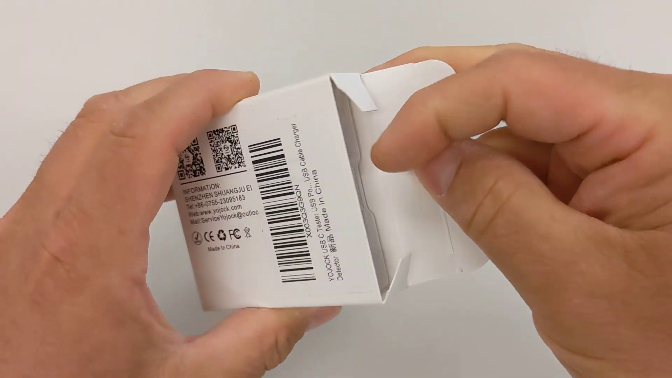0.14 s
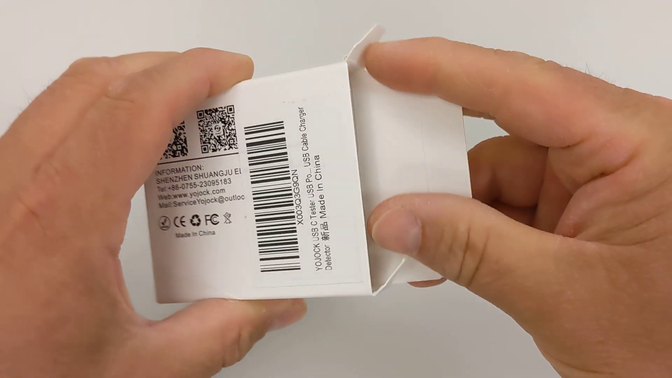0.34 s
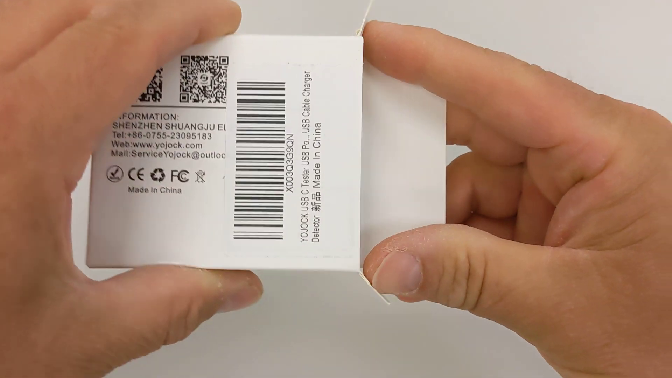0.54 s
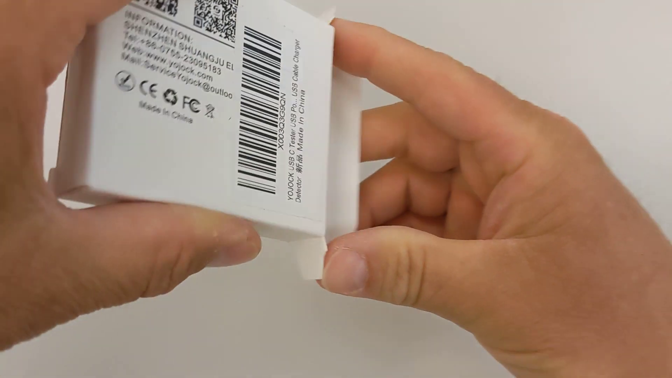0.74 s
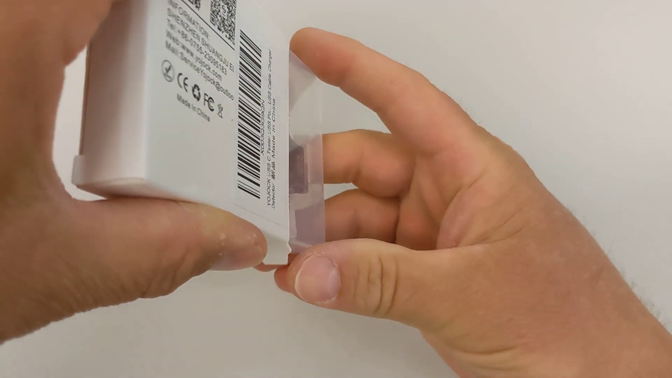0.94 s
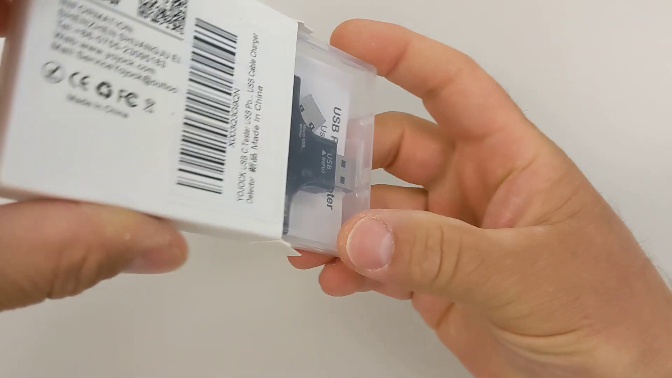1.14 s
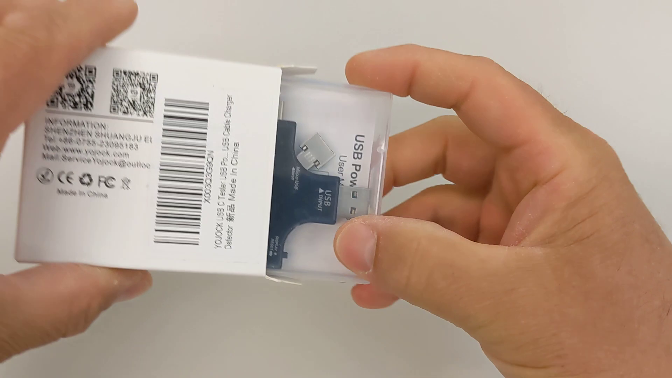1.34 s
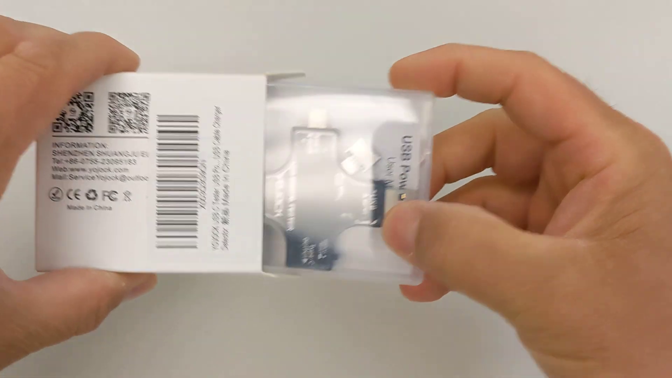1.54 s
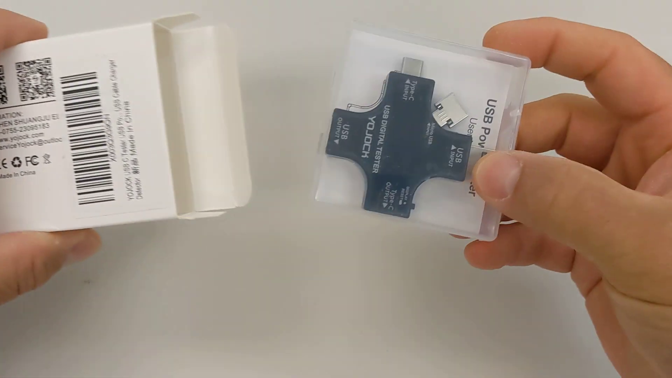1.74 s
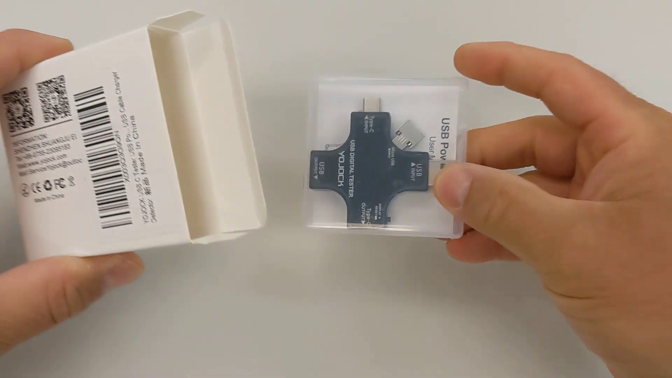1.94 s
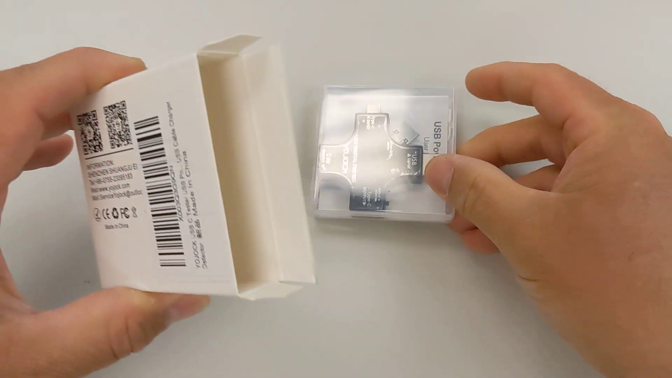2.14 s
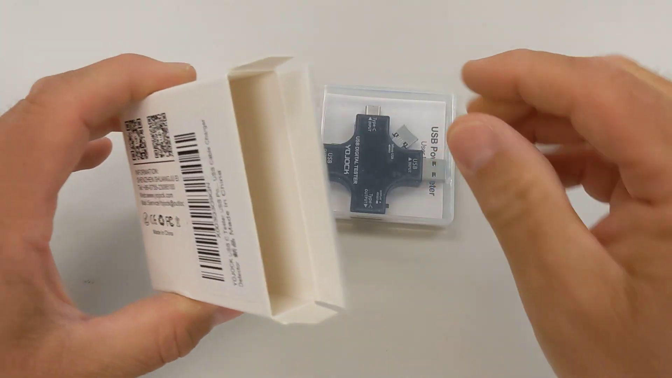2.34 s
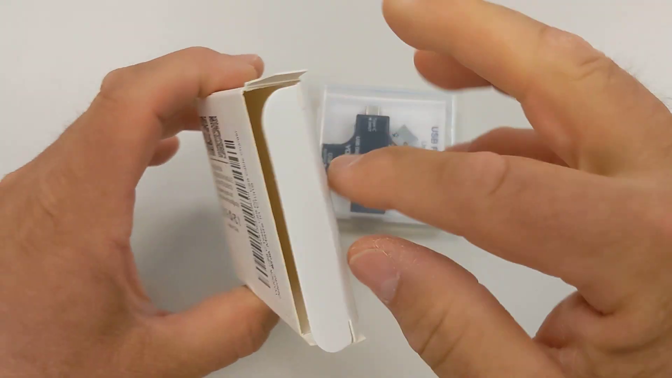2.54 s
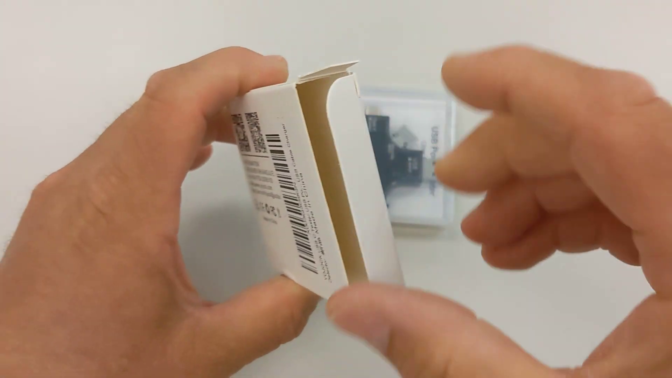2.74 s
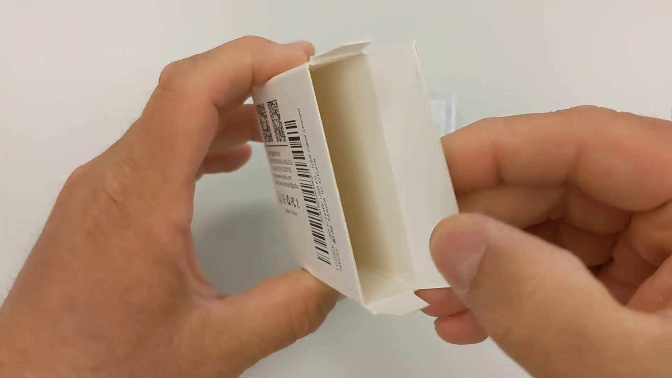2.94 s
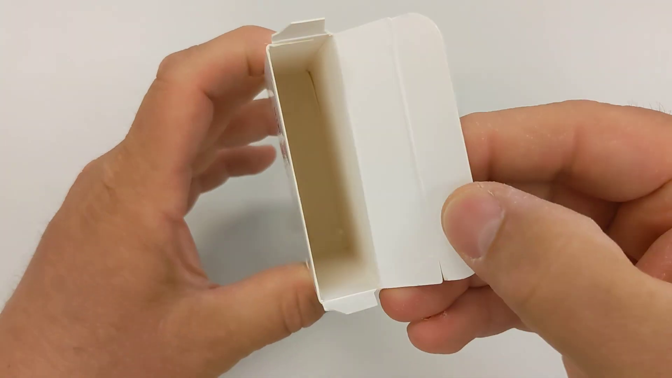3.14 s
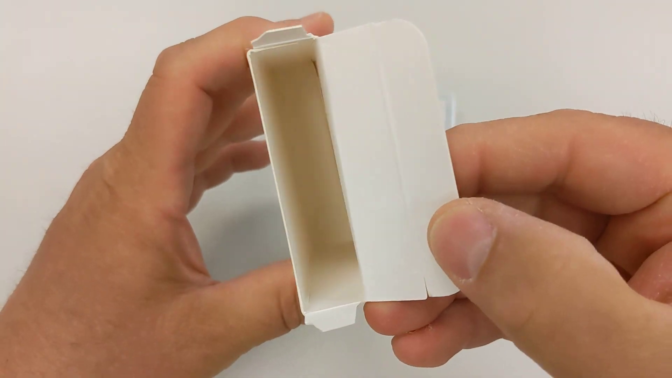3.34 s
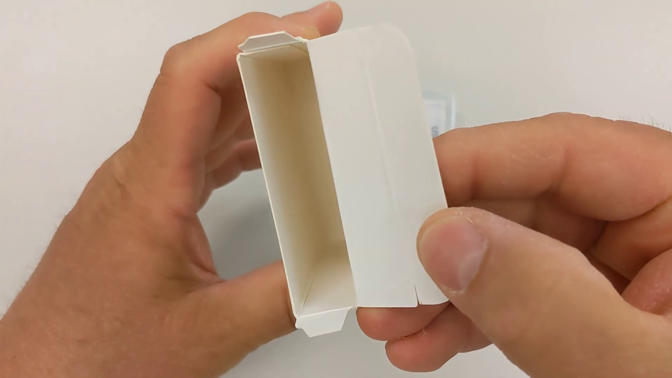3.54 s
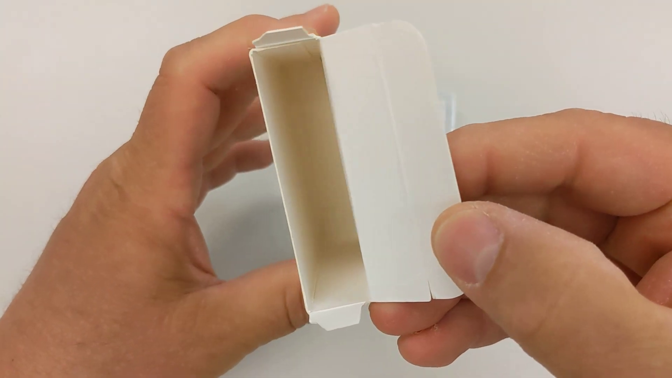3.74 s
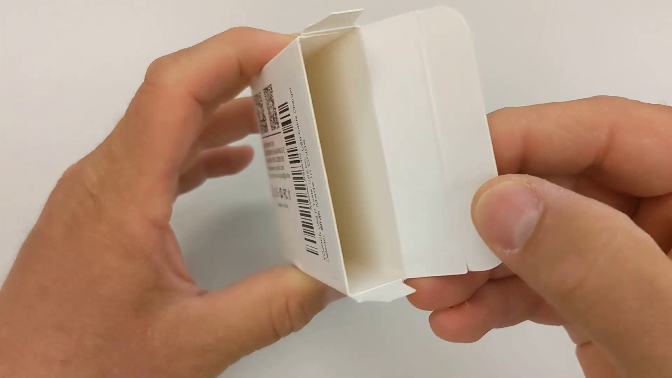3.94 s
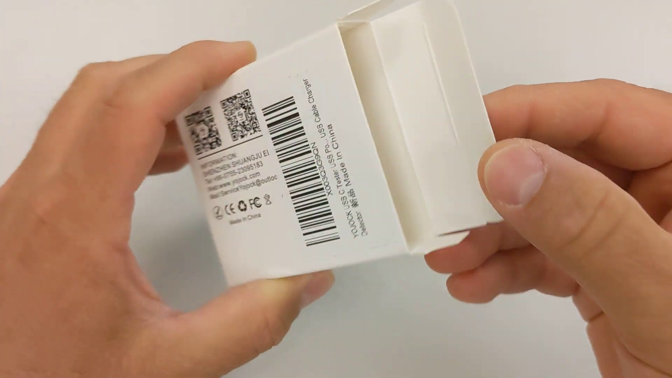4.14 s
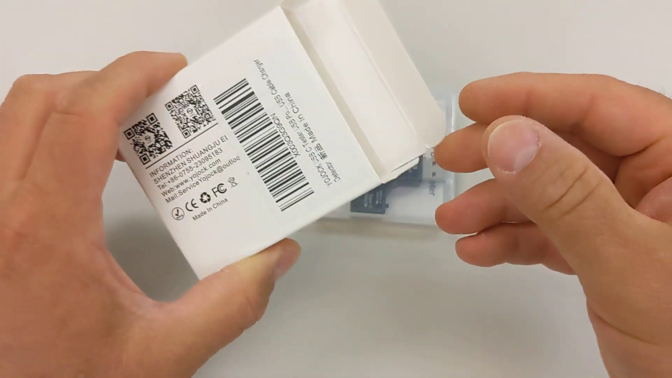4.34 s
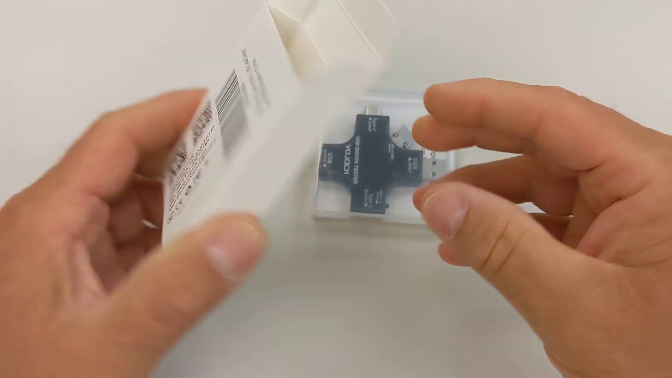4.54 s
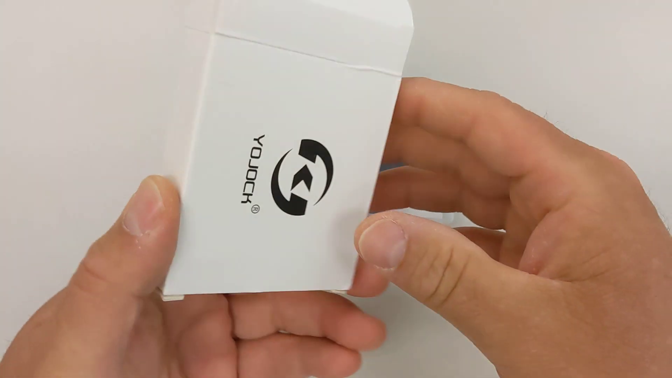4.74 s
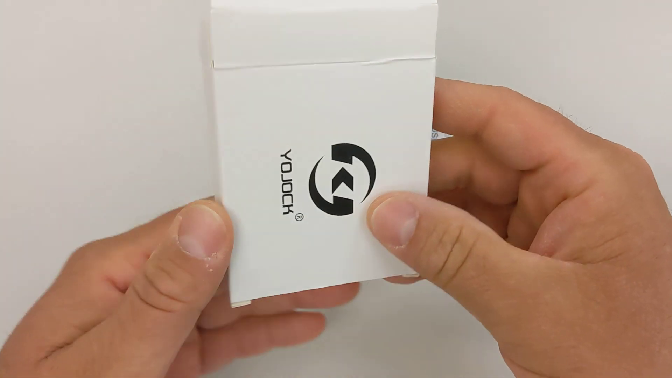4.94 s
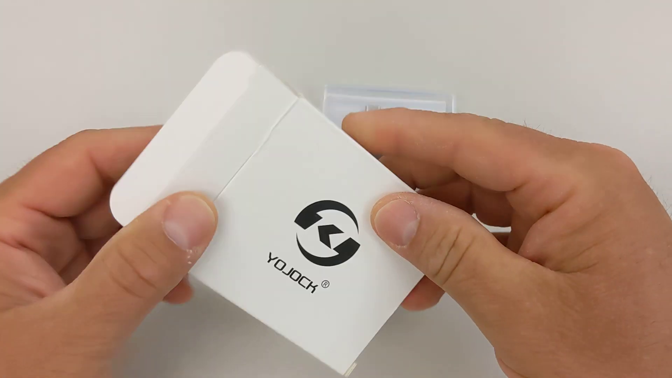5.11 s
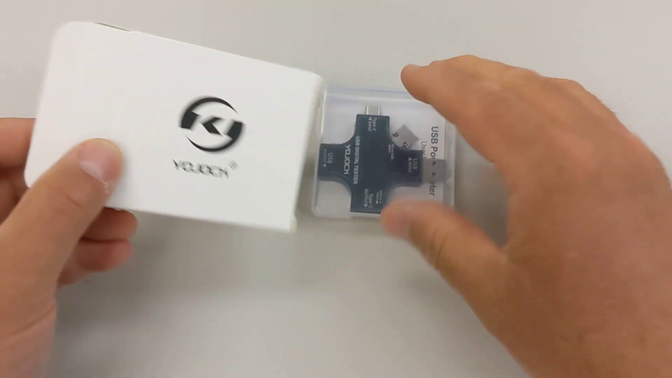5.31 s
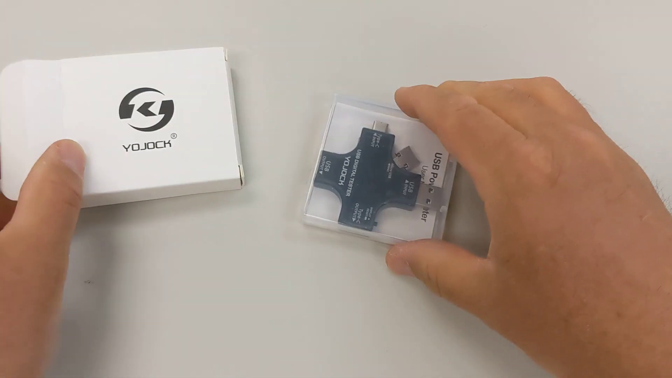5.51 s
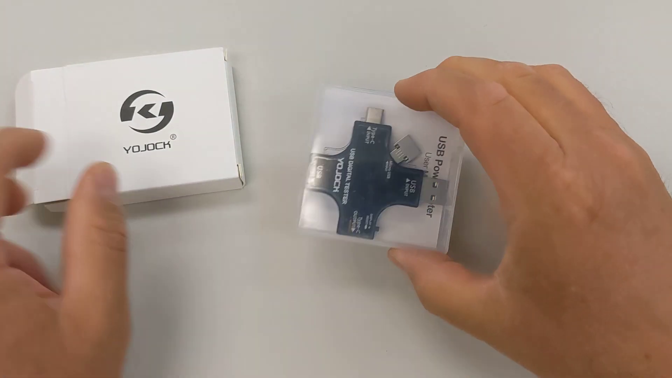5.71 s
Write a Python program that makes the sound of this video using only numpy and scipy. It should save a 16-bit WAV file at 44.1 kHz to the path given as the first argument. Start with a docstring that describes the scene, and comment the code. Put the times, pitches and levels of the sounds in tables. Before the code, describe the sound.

Close dry card scraping and flap clicks, a plastic case clacking onto a tabletop, light handling, then a hollow box landing in a quiet room.

```python
"""First a dry brushing of card, close to the microphone and left of it: hands open a small paperboard box.
Rubs are dense sprays of tiny slips; flaps tick with short cracks that ring card, panels and hollow.
A plastic case scrapes out of its sleeve and knocks on a table nearly in front, as noise and damped modes.
The empty box is then turned over and laid down, skidding a little.
A small room answers with diffuse reflections; low ventilation rumble, even hiss and mains hum lie behind."""
import sys
import numpy as np
from scipy import signal
from scipy.fft import rfft, irfft
from scipy.io import wavfile
from scipy.ndimage import uniform_filter1d

SR = 44100
rng = np.random.default_rng(int(sys.argv[2]) if len(sys.argv) > 2 else 0)


def waveform_to_disk(signal):
    """Save audio, clipped to [-1, 1], as 16-bit WAV at the path in sys.argv[1]."""
    frames = np.transpose(np.atleast_2d(signal))
    scaled = np.clip(frames, -1, 1) * 32767
    samples = np.round(scaled).astype(np.int16)
    wavfile.write(sys.argv[1], SR, samples)


N = 254456
TIME = np.arange(N) / SR
HIT_TIME = TIME[:SR // 4]

# Strokes of the hands. Levels are those at full hand speed, before the room.
# Columns of all five: start_s, rise_s, hold_s, fall_s, hiss_db, hollow_db, left_minus_right_db [s, dB]
# a flap edge dragged along the card
EDGE_STROKES = [(.212, 0.046, 0.022, 0.044, -43, -55, 5.5), (.255, 0.06, 0.04, 0.023, -42, -55.5, 7.5),
                (2.522, 0.01, 0.06, 0.054, -57, -59, 7), (2.55, 0.037, 0.0082, 0.027, -47.5, -68, 5.5),
                (2.672, 0.0068, 0.0086, 0.022, -50, -52.5, 6.5)]
# the lid folded back
LID_STROKES = [(-0.021, 0.053, 0.095, 0.11, -51, -58, 2.8), (0.379, 0.054, .004, .045, -53, -47, 1),
               (0.27, 0.18, 0.073, .11, -52.5, -58, 2.5), (0.502, 0.028, .012, 0.033, -68, -54.5, 2.7)]
# the side tabs pushed aside
TAB_STROKES = [(.56, 0.11, 0.037, 0.15, -50, -57.5, 2.4), (.77, 0.046, 0.072, .05, -51.5, -61, 3.7),
               (.865, 0.021, .015, 0.035, -48, -47.5, 4.9), (.92, .06, .042, 0.015, -58, -61.5, 3)]
# fingers shifting their grip
FINGER_STROKES = [(1.42, 0.039, 0.14, .05, -70.5, -75, 3), (1.53, 0.085, 0.0091, 0.049, -60, -52, 6.7),
                  (1.625, 0.016, 0.011, 0.054, -54.5, -78, 4), (2.835, 0.026, 0.038, .035, -59, -57.5, 4),
                  (2.88, 0.096, 0.11, .1, -67, -64, 3.2), (3.025, 0.031, 0.0073, .028, -54, -56, 4.8),
                  (3.08, 0.069, 0.051, 0.11, -71, -73, 6), (3.41, 0.0068, 0.0045, 0.11, -90, -70, 6),
                  (3.87, .12, 0.0084, 0.057, -71, -65, 4), (4, 0.16, 0.1, 0.19, -73, -66.5, 2),
                  (4.2, 0.031, 0.0096, 0.012, -53, -52, 3), (4.53, .11, .005, 0.081, -61.5, -61, 7),
                  (4.51, .06, 0.18, .06, -86, -63.5, 3), (4.71, 0.051, 0.019, .09, -57, -64.5, 4.8),
                  (4.82, 0.052, .2, .075, -54, -59, 3.4), (5.1, 0.061, 0.024, 0.042, -53.5, -58, 6.8),
                  (5.2, 0.041, 0.014, 0.025, -51, -56, 4.6), (5.262, 0.033, 0.029, 0.016, -55.5, -58, 8),
                  (5.3, 0.054, 0.17, 0.068, -68.5, -76, 5)]
# the box skidding as it is laid on the table
TABLE_STROKES = [(5.52, 0.032, 0.09, 0.052, -59, -59, 5.6)]

# Surface hiss of each contact. Columns of all four: pitch_hz, relative_level_db [Hz, dB]
# card edge on card
EDGE_HISS = [(1000, -50), (1700, -30), (2230, 10), (2570, -16), (3370, 6.5), (3630, -5), (3950, 5),
             (6030, 1.5), (8860, 7.5), (10800, 4), (15000, 5), (16000, -26)]
# lid
LID_HISS = [(1000, -36), (1700, -1.5), (1880, 5.5), (2720, -8.5), (3250, 0.5), (3700, -6.5), (4680, -8.5),
            (5390, -6), (6150, -8), (7140, -2.5), (8300, -4.5), (10500, -9), (15100, -20), (16000, -28)]
# side tabs
TAB_HISS = [(1000, -66), (1700, 2), (2190, 2), (2900, -6), (3880, 2.5), (4260, -2), (4640, -12), (5340, 0),
            (6150, -10), (7010, -8.5), (8300, -3.5), (10400, -12), (14600, -30), (16000, -30)]
# fingers on card, and the box on the table
SKIN_HISS = [(1000, -29), (1700, -1.5), (1980, 4), (2540, -9.5), (2790, -6), (3250, -2.5), (3600, -3),
             (4380, -3), (6090, -8.5), (6940, -2.5), (10500, -7.5), (15100, -8.5), (16000, -14)]

# Spectra of the box and case. Columns of all five: pitch_hz, relative_level_db [Hz, dB]
# rubbed air in the box
HOLLOW_RUB_SPECTRUM = [(700, -73), (950, -12.5), (1150, 3.5), (1380, 7.5), (1560, -10.5), (1900, -13.5),
                       (2300, -12.5), (2800, -10.5), (4000, -39)]
# rubbed, fluttering panels
PANEL_RUB_SPECTRUM = [(120, -32), (250, -8.5), (400, -13), (600, -5), (820, -1), (1050, -17), (1600, -14)]
# case scraping inside the sleeve
SLEEVE_SPECTRUM = [(150, -12), (250, -16), (313, 0), (373, -10.5), (501, -6), (698, -7), (802, -13),
                   (1060, -7.5), (1820, -5.5), (2280, -5), (4190, -13.5), (13900, -20), (16000, -27)]
# contact noise of the plastic case
CASE_CRACK_SPECTRUM = [(200, -30), (450, -2), (1500, 2), (3000, -2.5), (4200, -4), (5300, -1), (6100, -8),
                       (6950, 1), (8000, -9), (10000, -8.5), (12000, -13.5), (16000, -23.5)]
# contact noise of the card
CARD_CRACK_SPECTRUM = [(400, -6.5), (1200, -20), (2800, 3.5), (4200, -0.5), (5500, -5.5), (8000, -1),
                       (11000, -6.5), (16000, -12)]

# flaps snapping, fingers tapping, the box landing; columns:
# start_s, panel_db, hollow_db, crack_db, crack_left_minus_right_db, flap_pitch_hz, flap_db [s, dB, Hz]
CARD_HITS = [(.082, -63, -58, -52, 2, 7500, -50), (.231, -69, -71, -54, 8, 2300, -56),
             (0.7972, -53, -60, -59, 5, 630, -53), (0.883, -45.5, -49, -59, -3, 930, -48.5),
             (0.8897, -52, -48, -38.5, 3, 3300, -53), (.895, -44.5, -50, -41.5, 5, 7170, -32),
             (0.958, -71, -57, -62, -3, 1300, -52.5), (1.019, -77, -74, -57, 5, 3600, -47.5),
             (1.406, -63, -64, -66.5, 4, 1283, -54), (2.5301, -62.5, -58, -55, 3, 4130, -44.5),
             (2.6764, -59.5, -72, -53.5, 0, 4350, -39), (2.8423, -72, -57, -55, 6, 4220, -48.5),
             (2.8936, -52, -47, -47.5, 4, 1340, -45), (2.8988, -73, -49, -55, 5, 2010, -45),
             (3.12, -90, -84.5, -68, 4, 8660, -54), (3.171, -77, -69, -59.5, 3, 8500, -51),
             (4.2222, -66, -54, -60, 11, 1269, -86), (4.7305, -66.5, -42, -47.5, 10, 1540, -51),
             (4.874, -68, -51, -57.5, 21, 1940, -55.5), (5.1862, -72, -50, -47, 12, 1410, -36.5),
             (5.191, -77, -40.5, -46, 3, 2236, -37), (5.215, -59.5, -43, -54, 6, 1210, -50),
             (5.244, -55, -47.5, -55, 5, 2190, -44.5), (5.499, -42, -30, -46.5, 7, 1370, -37),
             (5.535, -54, -44, -60, 4, 3000, -42), (5.542, -50, -51, -61, 4, 657, -48),
             (5.582, -49.5, -48, -42, 6.5, 2880, -33), (5.647, -52, -38, -42, -7, 2960, -48),
             (5.6489, -41, -37.5, -45, 12, 1870, -39.5)]
# edges catching and skidding; columns: start_s, length_s, level_db, pitch_hz [s, dB, Hz]
RASPS = [(0.299, 0.068, -47, 2400), (0.418, 0.031, -49, 1820), (0.42, 0.03, -51, 930),
         (.523, 0.029, -47, 1810), (.524, 0.041, -54, 840), (0.564, 0.053, -58, 700),
         (0.663, 0.11, -53, 4000), (0.821, 0.024, -56.5, 1320), (1.595, 0.041, -55, 945),
         (2.567, .05, -63, 4270), (4.217, 0.02, -53.5, 2560), (5.228, 0.042, -54, 1920),
         (5.322, 0.016, -51.5, 2880), (5.603, 0.027, -56, 3300), (5.501, .029, -48, 1460),
         (5.642, 0.022, -41, 2080)]
# the plastic case meeting the table; columns:
# start_s, table_thud_db, shell_db, crack_db, crack_left_minus_right_db, wall_pitch_hz, wall_db [s, dB, Hz]
CASE_HITS = [(2.0909, -30, -26.5, -28.5, 8, 1207, -32.5), (2.1977, -39.5, -30.5, -37.5, -1, 2253, -29.5),
             (2.2423, -41.5, -34.5, -46, 3.5, 2300, -38), (2.2558, -44, -44, -48, 4, 1320, -45),
             (2.264, -24.5, -28.5, -37, 5.5, 817, -37)]
# soft bumps of the hands; columns: start_s, level_db before the swell and fade, pitch_hz [s, dB, Hz]
BUMPS = [(0.889, -52, 190), (2.1, -48, 120), (2.269, -57, 204), (2.412, -47, 121), (2.90, -44, 146),
         (2.915, -53, 84.6), (4.73, -50, 191), (5.192, -50, 198), (5.216, -43, 300), (5.246, -47, 193),
         (5.50, -47.5, 212)]

# Resonances before scatter and detuning.
# Columns of all four: pitch_hz, relative_level_db, t60_s [Hz, dB, s]
# card panels
PANEL_MODES = [(260, -14, 0.044), (318, -10, 0.016), (540, -5, 0.012), (780, -2, 0.025)]
# air in the box
HOLLOW_MODES = [(1123, -6, 0.054), (1373, 8, 0.025), (1850, -16, 0.031), (2233, -3.5, 0.024),
                (3360, 3.5, 0.033)]
# table top
TABLE_MODES = [(220.4, -29, .17), (400, -16, 0.019), (557, -28, .15), (546, 2.5, 0.023), (721, -1, 0.02)]
# shell of the plastic case
SHELL_MODES = [(1130, 3, 0.014), (1330, 0, 0.0069), (1826, -6, 0.02), (2413, -4.5, 0.016),
               (2420, -30.5, .12), (2900, -5.5, .01), (3770, -1.5, 0.004)]

# spectrum of the room's rumble and hiss; columns: pitch_hz, relative_level_db [Hz, dB]
ROOM_SPECTRUM = [(15, -70.5), (25, -31.5), (53, -1.5), (64, 2), (123, -6.5), (166, -11), (242, -9),
                 (270, -18), (476, -25), (1020, -26.5), (1260, -24.5), (1520, -38.5), (2280, -39.5),
                 (2690, -40), (4490, -39), (16000, -48)]
# relative level of the low rumble, easing halfway through; columns: time_s, level_db [s, dB]
RUMBLE_LEVEL = [(0, 0), (2.8, 0), (3.4, -6), (5.1, -3), (5.77, -8)]
# mains hum, before a small wander; columns: pitch_hz, rms_level_db [Hz, dB]
HUM = [(120, -83), (239.5, -72.5)]

# panel flutter relative to the hiss of each contact (dB)
EDGE_PANEL_DB, LID_PANEL_DB, TAB_PANEL_DB, FINGER_PANEL_DB, TABLE_PANEL_DB = -12.5, -5, -4.5, -20.5, -2.5
# left minus right (dB)
HOLLOW_PAN_DB, PANEL_PAN_DB, SLIDE_PAN_DB = 3, 4, 3.6
SPEED_POWER = 1.116  # friction amplitude grows as this power of the hand's speed
# the case slides out in one pull: when it starts, and how it speeds up, glides and slows (s)
SLIDE_START_S, SLIDE_RISE_S, SLIDE_HOLD_S, SLIDE_FALL_S = 1.06, .19, .025, .215
SLIDE_DB = -51.5  # at full speed
ROOM_T60_S, ROOM_WET_DB, ROOM_DB = 0.4, -14, -63
TOP_HZ = 16200  # upper limit of the recorder


def rubbing():
    """Skin and flaps drag over the card: surface hiss, the hollow of the box and its fluttering panels."""
    contacts = [
        (EDGE_STROKES, EDGE_HISS, EDGE_PANEL_DB),
        (LID_STROKES, LID_HISS, LID_PANEL_DB),
        (TAB_STROKES, TAB_HISS, TAB_PANEL_DB),
        (FINGER_STROKES, SKIN_HISS, FINGER_PANEL_DB),
        (TABLE_STROKES, SKIN_HISS, TABLE_PANEL_DB),
    ]
    hiss, hollow_power, panel_power = 0, 0, 0
    for strokes, spectrum, flutter_db in contacts:
        hiss_power = 0  # overlapping strokes add in power
        for start_s, rise_s, hold_s, fall_s, hiss_db, hollow_db, pan_db in strokes:
            drag = stroke(start_s, rise_s, hold_s, fall_s)
            hiss_power = hiss_power + (drag * undb(hiss_db) * pan(pan_db)) ** 2
            hollow_power = hollow_power + (drag * undb(hollow_db)) ** 2
            panel_power = panel_power + (drag * undb(hiss_db + flutter_db)) ** 2
        rub = friction(spectrum, likeness=0.11, grain_db=2.0, catch_db=1.86)
        hiss = hiss + rub * np.sqrt(hiss_power)
    hollow = body_rub(HOLLOW_RUB_SPECTRUM, grain_db=2.0, catch_db=3.0)
    hollow = hollow * np.sqrt(hollow_power) * pan(HOLLOW_PAN_DB)
    panels = body_rub(PANEL_RUB_SPECTRUM, grain_db=3.0, catch_db=2.5)
    panels = panels * np.sqrt(panel_power) * pan(PANEL_PAN_DB)
    return hiss + hollow + panels


def stroke(start_s, rise_s, hold_s, fall_s):
    """Gain of one hand movement: it speeds up, glides and slows to rest."""
    speeding_up = (TIME - start_s) / rise_s
    slowing = 1 - (TIME - start_s - rise_s - hold_s) / fall_s
    speed = np.clip(np.minimum(speeding_up, slowing), 0, 1)
    return speed ** SPEED_POWER


def friction(spectrum, likeness, grain_db, catch_db):
    """Paper fibres catch and let go: dense tiny slips, bunched by uneven drag, with a few larger snags."""
    snags = rng.standard_normal(N) * (rng.random(N) < 110 / SR) * 4.5  # about 110 a second
    unevenness = undb(grain_db * walk(1500) + catch_db * walk(70))
    slips = (pair(likeness) + snags) * unevenness
    echoed = np.array([near_echoes(port) for port in slips])
    return unit(colour(echoed, spectrum))


def near_echoes(x, lags_s=(.0005, .0011, .0023), echo_db=-9, drift=0.071):
    """Reflections from the moving hands and the table comb the sound with shifting peaks."""
    echoes = sum(np.interp(TIME - lag * (1 + drift * walk(4)), TIME, x) for lag in lags_s)
    return x - undb(echo_db) * echoes


def body_rub(spectrum, grain_db, catch_db):
    """The same kind of catching drag rings the box as a whole, alike at both ports."""
    slips = rng.standard_normal(N) * undb(grain_db * walk(700) + catch_db * walk(70))
    return unit(colour(slips, spectrum))


def sliding():
    """The smooth case scrapes along the inside of the sleeve."""
    scrape = friction(SLEEVE_SPECTRUM, likeness=0.39, grain_db=1.5, catch_db=1.5)
    pull = stroke(SLIDE_START_S, SLIDE_RISE_S, SLIDE_HOLD_S, SLIDE_FALL_S)
    return scrape * undb(SLIDE_DB) * pull * pan(SLIDE_PAN_DB)


def rasps(grain_db=5, breadth=0.62):
    """A cut edge skids: a run of uneven slips rings the strip of card behind it."""
    out = np.zeros((2, N))
    slips = rng.standard_normal(N) * undb(grain_db * walk(900))
    for start_s, length_s, level_db, pitch_hz in RASPS:
        run = slips[int(start_s * SR):][:int(length_s * SR)]
        for _ in range(2):  # twice for steeper skirts
            run = resonate(run, pitch_hz, breadth * pitch_hz)
        run = unit(run * signal.windows.tukey(len(run)))
        add(out, start_s, undb(level_db) * run * pan(2.0))
    return out


def resonate(x, pitch_hz, width_hz):
    """One resonance with gain 1 at its centre."""
    b, a = signal.iirpeak(pitch_hz, pitch_hz / width_hz, fs=SR)
    return signal.lfilter(b, a, x)


def card_taps():
    """Each snap or tap is a dry crack that rings a flap, the panels and the air in the box."""
    out = np.zeros((2, N))
    for start_s, panel_db, hollow_db, crack_db, pan_db, flap_hz, flap_db in CARD_HITS:
        panel = undb(panel_db) * ring(PANEL_MODES, scatter_db=2, detune=.06)
        hollow = undb(hollow_db) * ring(HOLLOW_MODES, scatter_db=5.5, detune=0.079)
        flap = undb(flap_db) * flap_ring(flap_hz, cycles=4)
        add(out, start_s, contact(panel + hollow + flap, rise_s=0.00052) * pan(4.7))
        add(out, start_s, undb(crack_db) * crack(CARD_CRACK_SPECTRUM, decay_s=0.0028) * pan(pan_db))
    return out


def case_knocks():
    """The case touches the table corner by corner, then drops flat, ringing table, shell and wall."""
    out = np.zeros((2, N))
    for start_s, thud_db, shell_db, crack_db, pan_db, wall_hz, wall_db in CASE_HITS:
        thud = undb(thud_db) * ring(TABLE_MODES, scatter_db=9.5, detune=.015)
        shell = undb(shell_db) * ring(SHELL_MODES, scatter_db=2, detune=.015)
        wall = undb(wall_db) * flap_ring(wall_hz, cycles=3.8)
        add(out, start_s, contact(thud + shell + wall, rise_s=0.00035) * pan(1.8))
        add(out, start_s, undb(crack_db) * crack(CASE_CRACK_SPECTRUM, decay_s=0.0018) * pan(pan_db))
    return out


def ring(modes, scatter_db, detune):
    """Damped modes after one blow; the place of the blow and the grip change their strength and pitch."""
    out = 0
    for k, (hz, db, t60_s) in enumerate(modes):
        place, grip = rng.uniform(-1, 1, 2)
        sign = (-1) ** k  # neighbouring modes start in opposite directions
        fade = np.exp(-np.log(1000) * HIT_TIME / t60_s)
        tone = np.sin(2 * np.pi * hz * (1 + detune * grip) * HIT_TIME)
        out = out + sign * undb(db + scatter_db * place) * fade * tone
    # small things radiate little bass
    return blow(signal.sosfilt(signal.butter(2, 170, "high", fs=SR, output="sos"), out))


def flap_ring(pitch_hz, cycles):
    """The struck part rings at its own pitch, falling to 1/e in the given number of cycles."""
    return blow(np.sin(2 * np.pi * pitch_hz * HIT_TIME) * np.exp(-pitch_hz * HIT_TIME / cycles))


def contact(sound, rise_s):
    """The contact builds up over a moment instead of striking at once."""
    return sound * (1 - np.exp(-HIT_TIME / rise_s))


def crack(spectrum, decay_s, rise_s=0.00041):
    """The burst of noise from a contact; it is only partly alike at the two ports."""
    lead = SR // 500  # room ahead of the burst while filtering
    shape = np.exp(-HIT_TIME / decay_s) * (1 - np.exp(-HIT_TIME / rise_s))
    burst = pair(.35)[:, :len(HIT_TIME)] * shape
    burst = colour(np.roll(burst, lead, axis=1), spectrum)[:, lead:]
    return np.array([blow(port) for port in burst])


def bumps(rise_s=0.0033, decay_s=0.0087):
    """Soft, low thumps of the hands on box and table: sines that swell and die quickly."""
    out = np.zeros((2, N))
    shape = (1 - np.exp(-HIT_TIME / rise_s)) * np.exp(-HIT_TIME / decay_s)
    for start_s, level_db, pitch_hz in BUMPS:
        add(out, start_s, undb(level_db) * np.sin(2 * np.pi * pitch_hz * HIT_TIME) * shape)
    return out


def room(dry, first_s=0.0039):
    """A small room: diffuse reflections, duller than the direct sound and alike at both ports in the bass."""
    t = TIME[:SR // 2]
    fade = np.exp(-np.log(1000) * t / ROOM_T60_S) * np.clip(t / first_s - 1, 0, 1)
    low_spectrum = [(150, 12.0), (550, 2.5), (1200, -6.0), (2500, -9.5), (5000, -25.5)]
    high_spectrum = [(600, -21), (2300, -6.0), (4200, -5), (7000, -6.5), (10000, -6.0), (16000, -9)]
    low = colour(pair(.85)[:, :len(t)], low_spectrum)
    high = colour(pair(0.21)[:, :len(t)], high_spectrum)
    response = (low + high) * fade / np.sqrt(np.sum(fade ** 2))
    reflections = signal.fftconvolve(dry, response, axes=1)[:, :N]
    return dry + undb(ROOM_WET_DB) * reflections


def background():
    """Ventilation rumble nearly alike at both ports, faint even hiss and mains hum."""
    rumble_spectrum = [(25, -16), (45, -6.5), (60, -1.5), (80, -3), (500, -4.5), (4000, -20.5)]
    rumble_s, rumble_db = np.transpose(RUMBLE_LEVEL)
    rumble = colour(pair(0.96), rumble_spectrum) * undb(np.interp(TIME, rumble_s, rumble_db))
    air = colour(pair(0.067), [(300, -15.5), (2000, 4.0), (4000, 4.0)])
    bed = undb(ROOM_DB) * unit(colour(rumble + air, ROOM_SPECTRUM))
    hum = sum(undb(db) * np.sqrt(2) * np.sin(2 * np.pi * hz * TIME) for hz, db in HUM)
    return bed + hum * undb(1.2 * walk(5.7))


def pair(likeness):
    """Two partly alike noises, one for each microphone port."""
    shared = np.clip(likeness, 0, 1)
    return np.sqrt(shared) * rng.standard_normal(N) + np.sqrt(1 - shared) * rng.standard_normal((2, N))


def pan(db):
    """Left and right gains for a level difference, left minus right."""
    gains = undb(np.array([db, -db]).reshape(2, -1) / 2)
    return gains / gains.mean(axis=0)


def ports(sound, lag_s):
    """The right microphone port hears the sound a moment after the left."""
    return np.array([sound[0], np.roll(sound[1], int(round(lag_s * SR)))])


def colour(x, points):
    """Filter by a spectrum of (Hz, dB) points."""
    hz, db = np.transpose(points)
    f = np.maximum(np.fft.rfftfreq(x.shape[-1], 1 / SR), 1)
    gain = undb(np.interp(np.log(f), np.log(hz), db))
    return irfft(rfft(x) * gain, x.shape[-1])


def walk(rate):
    """Smooth random wander of rms 1, with about `rate` new values a second."""
    k = int(SR / rate)
    steps = np.repeat(rng.standard_normal(N // k + 1), k)
    return unit(uniform_filter1d(steps, k)[:N])


def undb(db):
    """Decibels to gain."""
    return 10 ** (np.asarray(db) / 20)


def unit(x):
    """Scale to rms 1."""
    return x / np.sqrt(np.mean(x ** 2))


def blow(x):
    """Scale a short sound so its whole energy equals rms 1 over a hundredth of a second."""
    return x / np.sqrt(np.sum(x ** 2) / (SR / 100))


def add(out, start_s, sound):
    """Mix a sound in at its start time."""
    i = max(int(start_s * SR), 0)
    out[..., i:i + sound.shape[-1]] += sound[..., :N - i]


def scene():
    """The box is held left of the microphone; the case lands nearly in front of it."""
    box = ports(rubbing() + sliding() + rasps() + card_taps() + bumps(), lag_s=0.00015)
    case = ports(case_knocks(), lag_s=.00005)
    return room(box + case) + background()


def record(dry):
    """The recorder cuts the deepest bass and the top."""
    lean = signal.sosfilt(signal.butter(2, 36, "high", fs=SR, output="sos"), dry)
    return signal.sosfilt(signal.ellip(10, .2, 70, TOP_HZ, fs=SR, output="sos"), lean)


dry = scene()
out = record(dry)
waveform_to_disk(out)
```